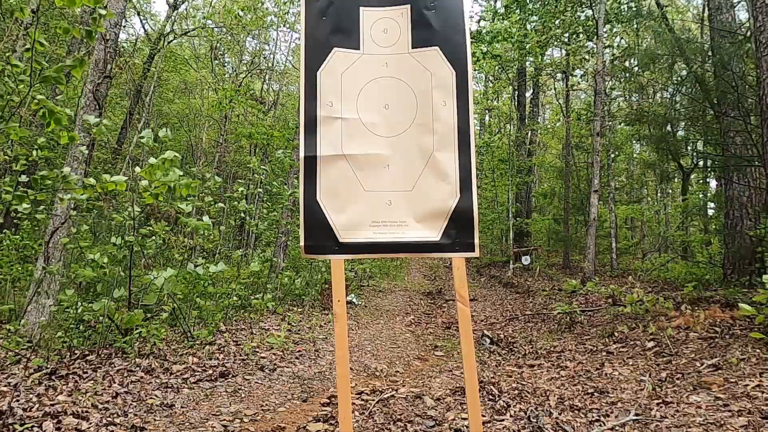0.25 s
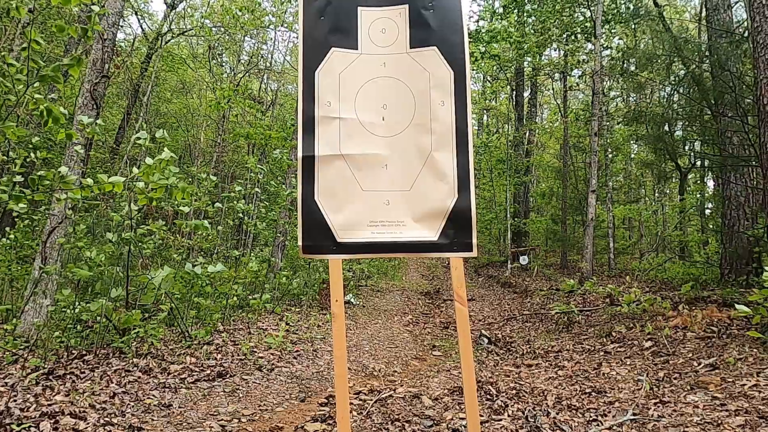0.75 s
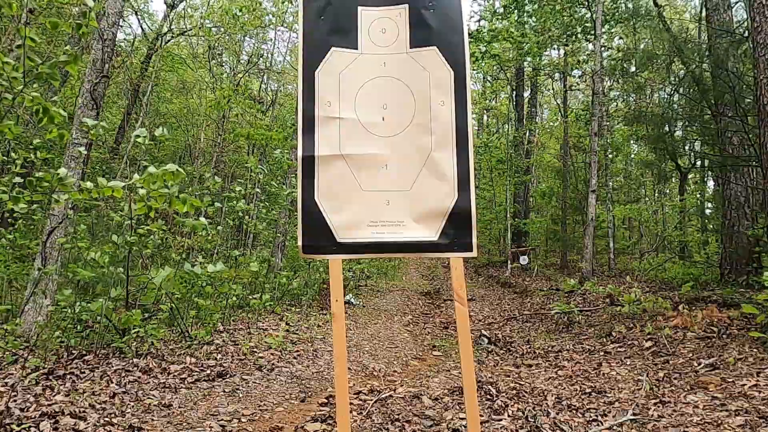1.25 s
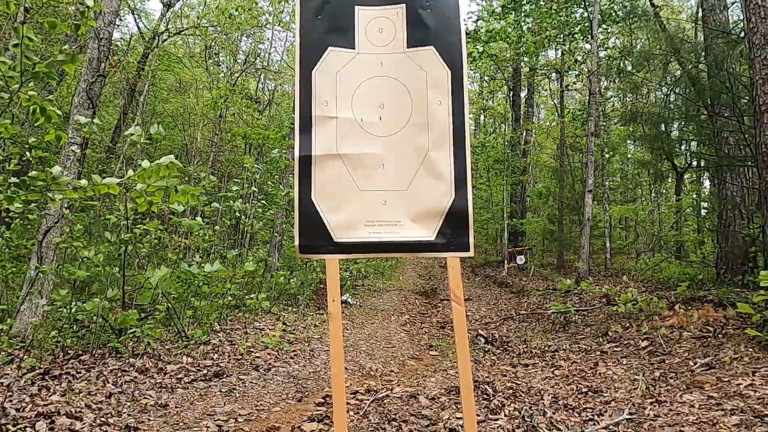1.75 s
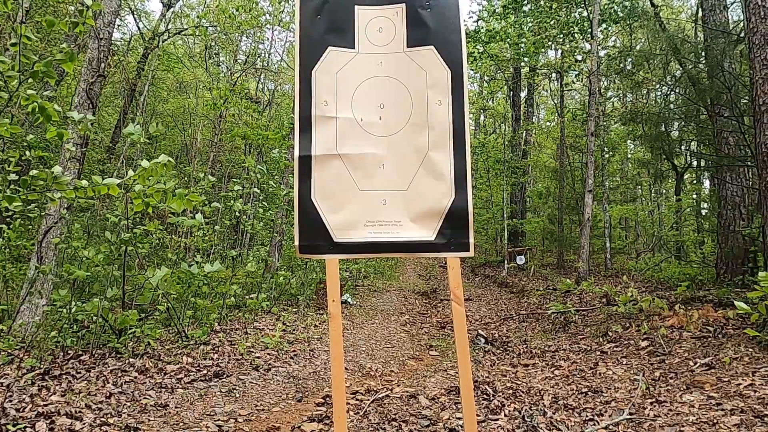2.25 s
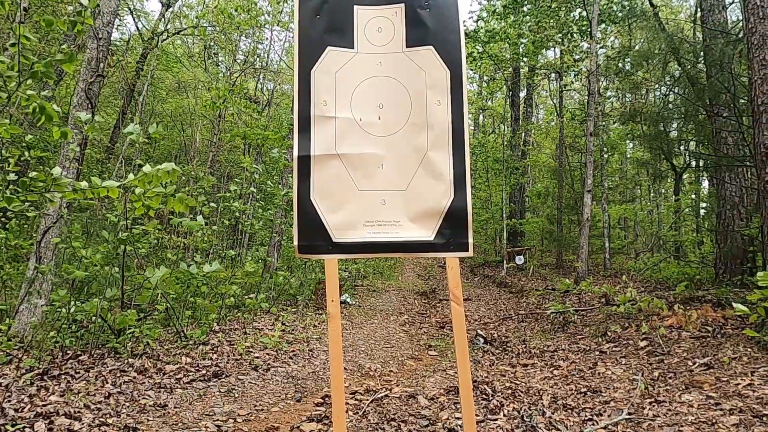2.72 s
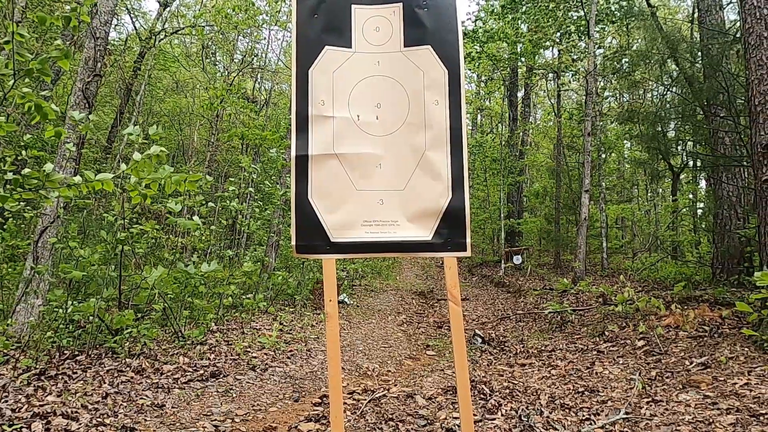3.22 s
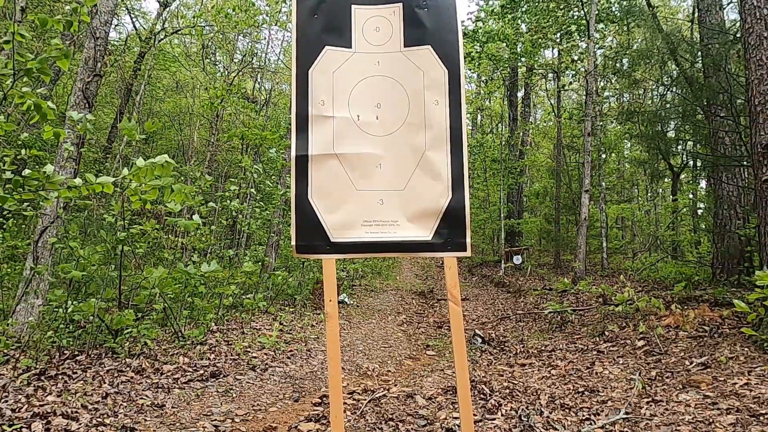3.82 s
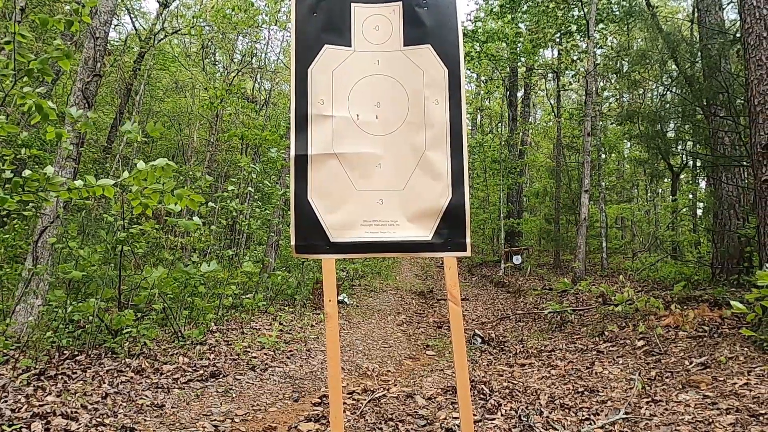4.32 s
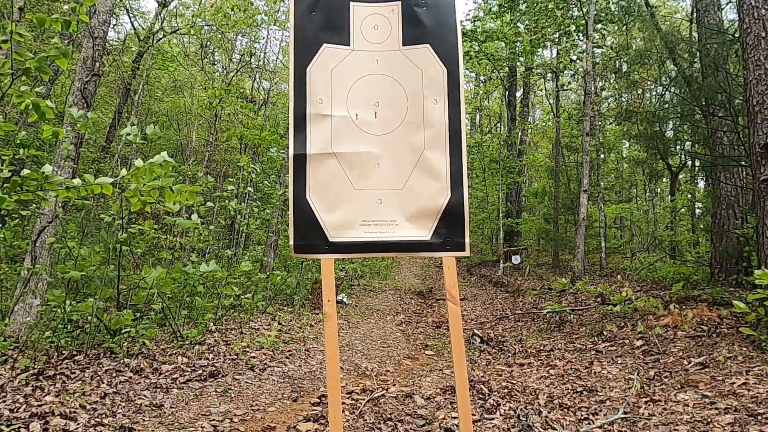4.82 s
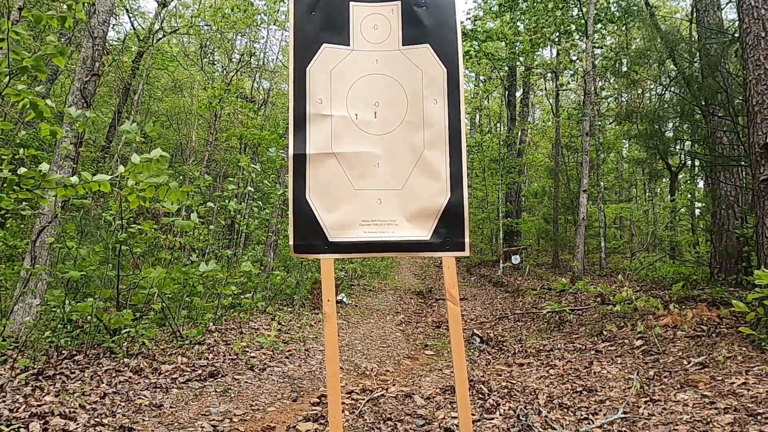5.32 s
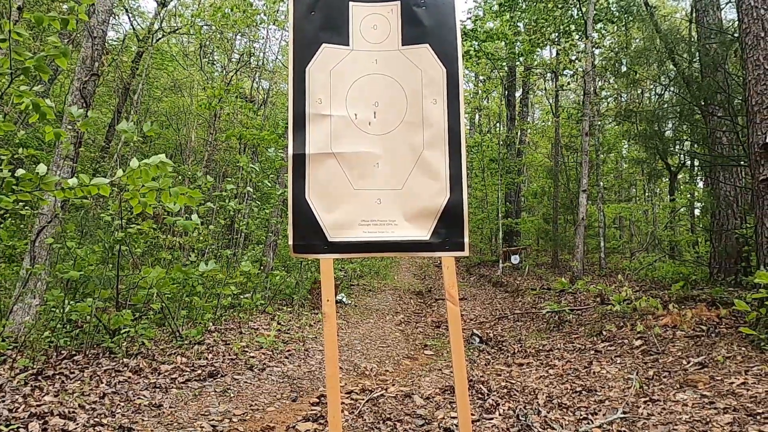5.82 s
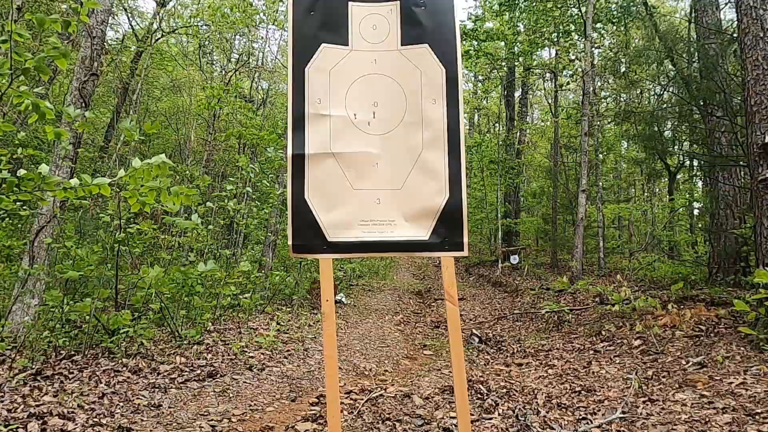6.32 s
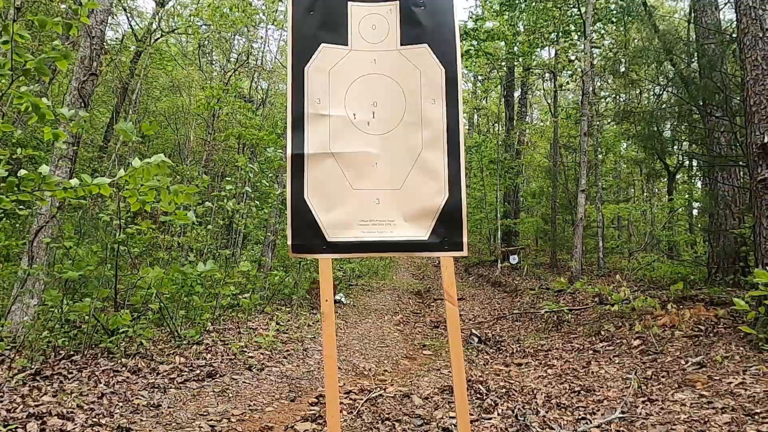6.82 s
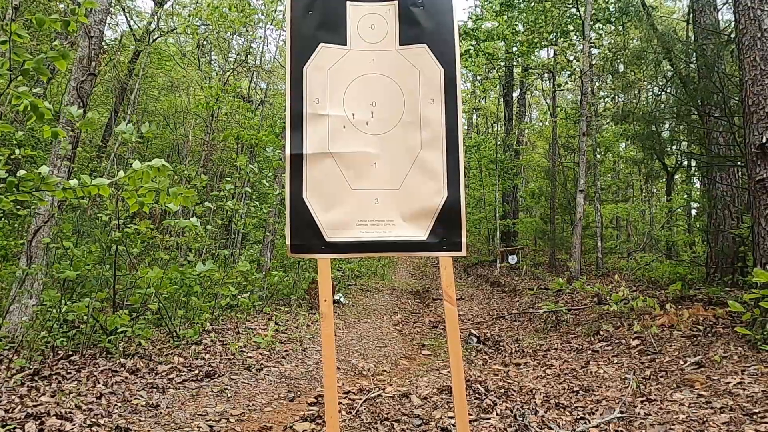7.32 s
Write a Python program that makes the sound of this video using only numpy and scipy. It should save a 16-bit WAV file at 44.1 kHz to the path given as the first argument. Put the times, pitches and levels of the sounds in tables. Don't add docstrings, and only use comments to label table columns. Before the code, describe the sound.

Outdoor wooded shooting range, microphone by a paper target. After a snippet of leafy hiss and bench clatter, six deliberate handgun shots ring out. Each has a very short tonal buzz just ahead, a sharp crack fused with a low thump, near slapback and torn-paper snap, then a diffuse forest tail of about a second or more. Faint breeze rumble and small clicks remain between; the sound is nearly mono, with gain ducked by each blast.

```python
import sys
import numpy as np
from scipy import signal
from scipy.fft import rfft, irfft
from scipy.io import wavfile
from scipy.ndimage import uniform_filter1d

SR = 44100
rng = np.random.default_rng(int(sys.argv[2]) if len(sys.argv) > 2 else 0)


def generate_wav(sig):
    pcm = np.round(np.clip(np.atleast_2d(sig).T, -1, 1) * 32767).astype(np.int16)
    wavfile.write(sys.argv[1], SR, pcm)


def gain_from_db(level_db):
    decades = np.asarray(level_db, float) / 20
    return 10 ** decades


N = 333396
T = np.arange(N) / SR


def rms_one(x):
    return x / np.sqrt(np.mean(x ** 2) + 1e-20)


def at_hz(points, hz):
    table_hz, values = np.transpose(points)
    return np.interp(np.log(hz), np.log(table_hz), values)


def coloured(spectrum, size):
    hz = np.maximum(np.fft.rfftfreq(size, 1 / SR), 10)
    white = rfft(rng.standard_normal(size))
    return rms_one(irfft(white * gain_from_db(at_hz(spectrum, hz)), size))


def filtered(x, order, hz, kind):
    return signal.sosfilt(signal.butter(order, hz, kind, fs=SR, output="sos"), x)


def ring(clicks, hz, t60_s):
    radius = gain_from_db(-60 / (t60_s * SR))
    angle = 2 * np.pi * hz / SR
    return signal.lfilter([0, np.sin(angle)], [1, -2 * radius * np.cos(angle), radius ** 2], clicks)


def decay(age_s, t60_s):
    return gain_from_db(-60 * age_s / t60_s)


def add(out, sound, start_s):
    i = round(start_s * SR)
    out[i:i + len(sound)] += sound[:N - i]


# centre in seconds, level above the mean in dB, width in seconds.
GUSTS = [
    (.26, 10, 0.2),
    (.62, 6, .1),
    (1.01, 18, 0.047),
    (2.55, 3, 0.22),
    (6.5, 10.5, .05),
    (6.75, -8.5, 0.23),
    (7.2, 5, .06),
    (7.56, 11, 0.06),
]


def gusts_db():
    mean_db, lumps_db, lumps_hz = -57, 2.5, 8.9
    knots_s = np.arange(100) / lumps_hz
    lumps = np.interp(T, knots_s, rng.standard_normal(len(knots_s)))
    puffs_db = np.sum([db * np.exp(-((T - s) / width_s) ** 2) for s, db, width_s in GUSTS], axis=0)
    return mean_db + lumps_db * lumps + puffs_db


# frequency in Hz, level in dB per Hz.
STILL_AIR = [(150, -18), (350, -0.5), (1200, -7), (2500, -11), (5000, -18), (8400, -23), (9500, -27.5),
             (15000, -55)]
# frequency in Hz, level in dB per Hz.
BENCH_HISS = [(25, -32), (130, -2), (432, -8.5), (1080, -10.5), (1300, -15), (9000, -23), (11500, -39),
              (15500, -47)]


def background():
    cut_s, duck_db, recover_s = 0.1932, -19.5, 2
    target = np.clip((T - cut_s) / 0.0051, 0, 1)
    rumble = [(12, -3), (28, -3.5), (55, -5.5), (90, -6.5), (200, -20), (400, -57.5), (900, -120)]
    wind = gain_from_db(gusts_db()) * coloured(rumble, N)
    ducked = np.max([np.exp(-np.abs(T - shot[0]) / recover_s) * (T > shot[0]) for shot in SHOTS], axis=0)
    stir_db = 0.9 * coloured([(10, 0.0), (14, -9), (30, -41.5), (60, -89.5)], N)
    air = gain_from_db(-58 + stir_db + duck_db * ducked) * coloured(STILL_AIR, N)
    bench = gain_from_db(-42.5) * coloured(BENCH_HISS, N)
    return (1 - target) * bench + target * (wind + air)


# start in seconds, peak in dB, dull knock in Hz, knock level in dB,
# bright level in dB.
HANDLING = [
    (.0937, -17., 1900., -7., 0.),
    (.1178, -29., 1200., -2., -8.),
    (.1666, -25., 1800., -8., 0.),
]
# start in seconds, peak in dB, lowest frequency in Hz,
# share of rustle after it (0-1).
TICKS = [(.229, -52, 1500., 0.39), (.3575, -61, 900., .05), (1.12, -69, 7000., .1),
         (1.653, -49, 2000., .05), (2.352, -70, 7060, .1), (3.585, -71, 7000., 0.2), (4.4748, -42, 920, 0),
         (5.2147, -57, 4000., .3), (5.325, -58.5, 4500., 0.44), (5.487, -69, 5540, 0.4),
         (5.590, -43.5, 900., 0), (6.38, -70, 7000., 0.05), (7.004, -56.5, 2000., 0.15)]


def ticks():
    out, size = np.zeros(N), SR // 12
    click, age_s = np.arange(size) == 0, T[:size]
    for s, db, knock_hz, knock_db, bright_db in HANDLING:
        knock = gain_from_db(db + knock_db) * ring(click, knock_hz, 0.0077)
        bright = gain_from_db(db + bright_db) * ring(click, 6300, 0.0019)
        add(out, knock - bright, s)
    for s, db, low_hz, rustle in TICKS:
        dry_leaf = coloured([(low_hz / 2, -30.), (low_hz, 0.), (8500, -6.), (10500, -20.), (13000, -55.)], size)
        add(out, gain_from_db(db) * dry_leaf * (decay(age_s, 0.011) + rustle * decay(age_s, .1)), s)
    return out


# time after the crack in seconds, level around 800 Hz in dB.
WASH = [(.03, -33.5), (.08, -36.5), (.16, -33), (.24, -31), (.32, -35), (.48, -39.5), (.8, -44), (1.2, -48),
        (1.7, -55)]
# slowness of the release as a ratio, level in dB, brightness in dB per octave.
RELEASE = [
    (1.32, -0.5, 0.5),
    (1.06, 0, -0.53),
    (1.034, -0.5, -0.4),
    (1.097, 0.43, 0.5),
    (1.005, -0.5, -0.57),
    (1.13, 0.5, 0.74),
]
# frequency in Hz, level in dB per Hz.
NEAR_TREES = [(29, -48), (50, -28.5), (151, -6.5), (404, -7), (466, -3.5), (578, -4.5), (771, -4),
              (1590, -10.5), (4670, -18), (8510, -32), (15500, -65)]
# frequency in Hz, level in dB per Hz.
FAR_TREES = [(59, -51.5), (100, -16), (460, -0.5), (720, 1), (1100, -2.5), (1350, -10.5), (1900, -19.5),
             (3500, -34.5), (6000, -53.5), (9000, -79)]
# frequency in Hz, loss beyond the middle band
# in dB per second.
LEAF_LOSS = [(90, 22.5), (170, 59), (350, 29), (800, 26), (1500, 15.5), (3000, 21.5), (6000, 56.5),
             (10000, 97), (15000, 186)]
# frequency in Hz, share of power (0-1).
REPEATED = [(200, 1), (550, 0.71), (1200, 0.6), (2500, 0)]


def forest():
    out, size = np.zeros(N), round(1.7 * SR)
    age_s = T[:size]
    edges_hz = 45 * 2 ** np.arange(0, 8.6, 1 / 3)
    same = rng.standard_normal((2, size))
    fresh = rng.standard_normal((2, len(SHOTS), size))
    late_s = age_s - .21
    loss_s = np.maximum(late_s, 0) + 0.67 * np.minimum(late_s, 0)
    bright_db = np.array(RELEASE)[:, 2:]
    tails = 0
    for k, (low_hz, high_hz) in enumerate(zip(edges_hz, edges_hz[1:])):
        hz = np.sqrt(low_hz * high_hz)
        share = np.clip(at_hz(REPEATED, hz), 0, 1)
        noise = np.sqrt(share) * same[k % 2] + np.sqrt(1 - share) * fresh[k % 2]
        near = gain_from_db(at_hz(NEAR_TREES, hz) - at_hz(LEAF_LOSS, hz) * loss_s)
        near = near * gain_from_db(bright_db * max(np.log2(hz / 1000), 0))
        far = gain_from_db(at_hz(FAR_TREES, hz) - 6.5)
        tails = tails + np.hypot(near, far) * filtered(noise, 3, [low_hz, high_hz], "band")
    middle = filtered(tails, 2, [500, 1400], "band")
    evened = tails / np.sqrt(uniform_filter1d(np.mean(middle ** 2, axis=0), size=SR // 6))
    ends_s = [shot[0] for shot in SHOTS[1:]] + [T[-1]]
    for shot, end_s, tail, (slowness, db, _) in zip(SHOTS, ends_s, evened, RELEASE):
        wash_db = db + np.interp(age_s / slowness, *np.transpose(WASH))
        add(out, tail * gain_from_db(wash_db) * (shot[0] + age_s < end_s), shot[0])
    return out


# frequency in Hz, level in dB rms.
SURVIVOR = [(140, -17.5), (500, -21.5), (1100, -17.5), (2200, -21.5), (3300, -29), (5500, -31),
            (7500, -35.5), (15000, -68.5)]
# frequency in Hz, level in dB rms.
SMEAR_REST = [(45, -47.5), (140, -32), (1500, -46.5), (4000, -58), (7000, -56.5), (11000, -61.5),
              (15500, -99)]
LEAD_TONES = [(141, 891, 1266, 1359, 2109), (234, 984, 1078, 2203, 2484), (141, 1078, 1172, 2203, 2391),
              (141, 516, 1641, 1734, 2766), (1078, 1547, 1734, 1828, 2016), (516, 1266, 1547, 1641, 2109)]
UPPER_TONES = [(3141, 3516, 4266, 4828, 6609), (2672, 3609, 4359, 5766, 6516),
               (3047, 4547, 5391, 5766, 7359), (3516, 4172, 4547, 5766, 7266),
               (3422, 3797, 4641, 5203, 5672), (2859, 3609, 4078, 4734, 7547)]
# first band from Hz, to Hz, second band from Hz, to Hz.
DROPPED = [(2300, 2750, 7500, 8400), (3700, 4200, 6750, 8500), (3200, 4200, 7500, 9400),
           (3050, 3400, 7450, 8200), (2550, 3350, 7000, 8200), (2300, 2600, 5250, 5600)]


def smear():
    out, step_hz = np.zeros(N), 93.75
    kept_share, kept_spread_db, lesser_db, dropped_db = .3, 2.5, -7, -15.5
    grid_hz = (np.arange(165) + .5) * step_hz
    for shot, low, upper, gaps, release in zip(SHOTS, LEAD_TONES, UPPER_TONES, DROPPED, RELEASE):
        s, _, _, lead_s, smear_db = shot
        age_s = T[:round(lead_s * SR)]
        luck, spread = rng.random(len(grid_hz)), rng.standard_normal(len(grid_hz))
        kept_db = at_hz(SURVIVOR, grid_hz) + kept_spread_db * spread + lesser_db - 4 * (grid_hz < 2600)
        rest_db = at_hz(SMEAR_REST, grid_hz) + 1.4 + 6.0 * spread
        level_db = np.where((luck < kept_share) & (grid_hz > 400), kept_db, rest_db)
        level_db += dropped_db * (np.searchsorted(gaps, grid_hz) % 2)
        level_db += 3 * release[2] * np.log2(np.maximum(grid_hz / 3000, 1))
        leading = (np.array(low + upper) / step_hz).astype(int)
        level_db[leading] = at_hz(SURVIVOR, grid_hz[leading])
        cycles = grid_hz[:, None] * age_s + rng.random((len(grid_hz), 1))
        buzz = gain_from_db(level_db) @ np.sin(2 * np.pi * cycles)
        swell = np.sin(np.pi / 2 * np.minimum(age_s / 0.045, 1)) ** 2.96
        limiter_flutter = coloured([(40, -19.0), (150, -5.5), (400, -2.0), (1500, -41.5)], len(age_s))
        swell = swell * (1 + 0.25 * limiter_flutter)
        add(out, np.sqrt(2) * gain_from_db(smear_db) * swell * buzz, s - lead_s)
    return out


def struck(modes, size):
    click = np.arange(size) == 0
    rung = -sum(gain_from_db(db) * ring(click, hz, t60_s) for hz, db, t60_s in modes)
    return filtered(rung, 2, [45, 4200], "band")


# crack time in seconds, crack level in dB, blast level in dB, smear lead in seconds,
# smear level in dB.
SHOTS = [
    (0.4019, -2.5, 2, 0.05, 0.5),
    (1.6940, 4, 1.5, 0.045, -1),
    (2.879, 6.5, 2.5, 0.043, -2.6),
    (4.5178, 7, 1.5, 0.046, 0),
    (5.6309, 6, 1, .042, -3),
    (7.047, 1.5, 1.5, 0.045, -0.5),
]
# frequency in Hz, level in dB, T60 in seconds.
CRACK = [(1009, 1.5, 0.0076), (680, -12.5, 0.016), (2190, -17.5, 0.0091)]
# frequency in Hz, level in dB, T60 in seconds.
BLAST = [(215, 1.5, .0095), (750, -16., .008), (165, -16., .13), (85, -26., .10)]
# delay in seconds, crack level in dB, blast level in dB, sign.
ECHOES = [(.0101, -8., -19., 1), (.0186, -14., -17., -1), (.0230, -26., -19., -1), (.0340, -28., -20., 1),
          (.0480, -23., -22., -1), (.0650, -30., -26., 1), (.0870, -25., -26., -1), (.1030, -32., -24., 1),
          (.1090, -32., -24., 1), (.1150, -32., -25., 1), (.1500, -32., -28., -1), (.2150, -32., -29., 1)]
# frequency in Hz, level in dB per Hz.
SPLASH = [(250, -45), (700, 3), (1100, 12), (3500, -7), (8000, -14), (15000, -42.5)]
# frequency in Hz, level in dB per Hz.
SLAP = [(600, -23.5), (1800, 3), (4000, -2), (8000, -13.5), (12000, -25), (16000, -55.5)]


def shots():
    out, size, blast_delay_s = np.zeros(N), SR // 5, 0.002454
    crack, blast, age_s = struck(CRACK, size), struck(BLAST, size), T[:size]
    dull = signal.lfilter(*signal.butter(1, 3000, fs=SR), crack)
    front = 1 - np.exp(-age_s / .0004)
    for s, crack_db, blast_db, _, _ in SHOTS:
        add(out, gain_from_db(crack_db) * crack, s)
        add(out, gain_from_db(blast_db) * blast, s + blast_delay_s)
        for lag_s, echo_db, boom_db, sign in ECHOES:
            add(out, sign * gain_from_db(echo_db + rng.normal(0, 1.1)) * dull, s + lag_s)
            add(out, sign * gain_from_db(boom_db) * blast, s + lag_s + blast_delay_s)
        add(out, gain_from_db(-16.5) * coloured(SPLASH, size) * front * decay(age_s, 0.069), s)
        slap = gain_from_db(-16.5) * coloured(SLAP, size) * front * decay(age_s, .025)
        add(out, slap, s + ECHOES[0][0] - .0006)
    return filtered(out, 2, 42, "high")


# frequency in Hz, level in dB.
UNALIKE = [(100, -47.5), (1500, -41), (4000, -32.5), (8000, -26), (12000, -7.5), (16000, -5)]


def scene():
    mid = background() + ticks() + forest() + smear() + shots()
    hz = np.maximum(np.fft.rfftfreq(N, 1 / SR), 10)
    quarter_turn = np.exp(1j * np.pi / 2)
    side = irfft(rfft(mid) * gain_from_db(at_hz(UNALIKE, hz)) * quarter_turn * (hz > 0), N)
    return np.array([mid + side, mid - side])


def low_pass(x):
    return signal.sosfilt(signal.butter(12, 16480, fs=SR, output="sos"), x)


def record(dry):
    ceiling = .94
    held = ceiling * np.tanh((np.abs(dry) / ceiling) ** 3) ** (1 / 3) * np.sign(dry)
    held = filtered(held, 12, 15200, "low")
    return low_pass(held)


dry = scene()
out = record(dry)
generate_wav(out)
```